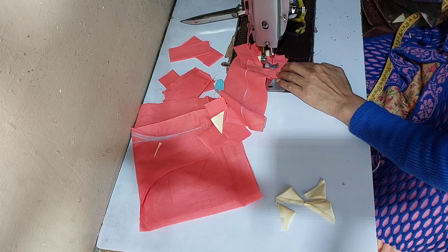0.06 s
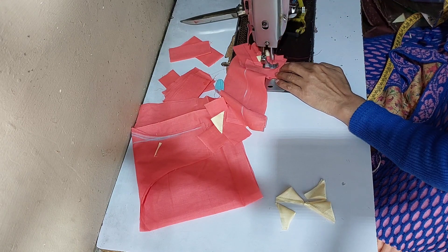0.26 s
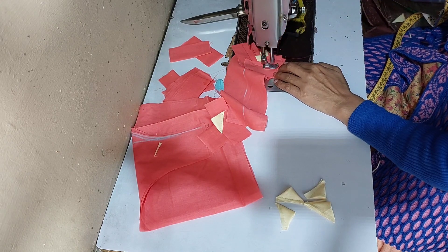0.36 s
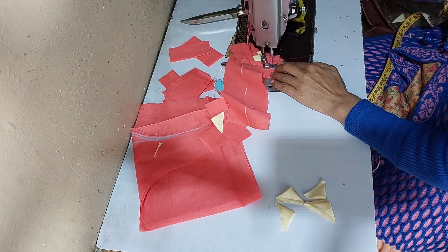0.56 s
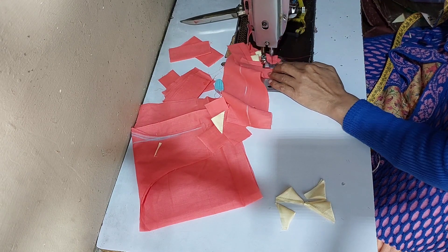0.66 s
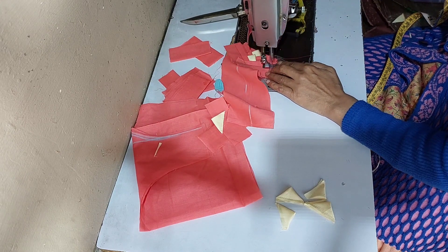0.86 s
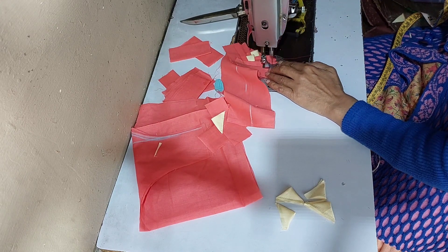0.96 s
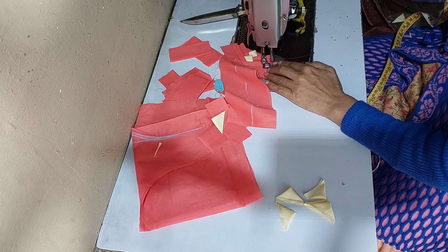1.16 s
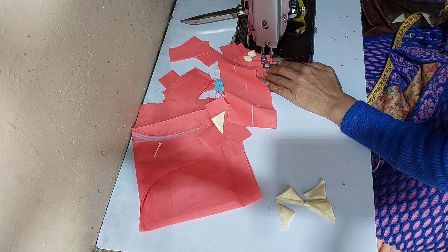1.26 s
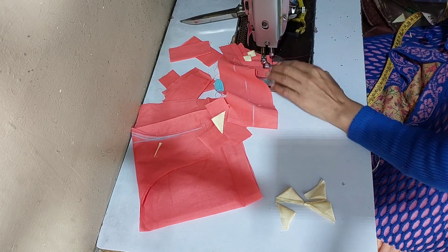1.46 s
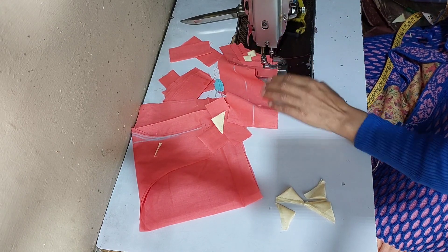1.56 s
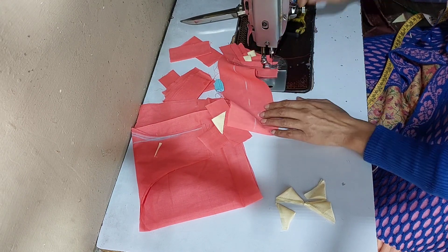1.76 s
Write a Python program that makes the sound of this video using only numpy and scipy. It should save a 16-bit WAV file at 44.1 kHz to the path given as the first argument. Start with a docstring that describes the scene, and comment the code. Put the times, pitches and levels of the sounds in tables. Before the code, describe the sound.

Sewing machine whirs up quickly, clatters through about a dozen stitches, coasts down and stops

```python
"""A household sewing machine on a table, in a quiet room with a low drone.
Frame and gears stir as shaped noise and wavering tones; the motor strains and whines (pulsed noise), the
table hums (unsteady sine), an overtone climbs. Then the bed knocks (decaying modes) and each stitch is a
bright needle swish (gritty noise burst) while the machine coasts down.
A few small clicks follow, each a scrape and a short ring."""
import sys
import numpy as np
from scipy import signal
from scipy.fft import rfft, irfft, next_fast_len
from scipy.io import wavfile
from scipy.ndimage import map_coordinates

SR = 44100
rng = np.random.default_rng(int(sys.argv[2]) if len(sys.argv) > 2 else 0)


def bounce(signal):
    """Save signal as a 16-bit WAV file at the path given by the first command-line argument."""
    frames = np.transpose(np.atleast_2d(signal))
    limited = np.clip(frames, -1, 1)
    pcm = np.round(limited * 32767).astype(np.int16)
    wavfile.write(sys.argv[1], SR, pcm)


def how_loud(loudness_db):
    """Turn decibels into a plain amplitude multiplier (0 dB gives 1, 20 dB gives 10)."""
    steps = np.asarray(loudness_db, float) / 20
    return 10 ** steps


N = 79380
T = np.arange(N) / SR


def unit(x):
    """Scale to rms 1."""
    return x / np.sqrt(np.mean(x ** 2) + 1e-20)


def along(points, hz):
    """Interpolate (f/Hz, value) points on a log frequency axis."""
    f, v = np.transpose(points)
    return np.interp(np.log(hz + 1), np.log(f + 1), v)


def curves(rows):
    """One value per sample for each column after the time."""
    s, *cols = np.transpose(rows)
    return [np.interp(T, s, c) for c in cols]


def wobble(knots_per_s):
    """Smooth random curve through normal-distributed knots."""
    return map_coordinates(rng.standard_normal(N // 50), [T * knots_per_s])


def sweep(hz):
    """Phase/rad of a varying frequency."""
    return 2 * np.pi * np.cumsum(hz, axis=-1) / SR


def filtered(x, response, mirror="even"):
    """x, mirrored past its ends, times a complex response of frequency."""
    edge = SR // 4
    wide = np.pad(x, ((0, 0), (edge, edge)), mode="reflect", reflect_type=mirror)
    m = next_fast_len(N + SR)
    spectrum = rfft(wide, m) * response(np.fft.rfftfreq(m, 1 / SR))
    return irfft(spectrum, m)[..., edge:edge + N]


def ringing(x, peaks):
    """x through parallel resonances of alternating sign, rms 1."""
    def response(f):
        """Sum of second-order bandpasses."""
        total = 0
        for k, (centre_hz, width_hz, db) in enumerate(peaks):
            damping = 1j * f * width_hz
            total = total + (-1) ** k * how_loud(db) * damping / (centre_hz ** 2 - f * f + damping)
        return total
    return unit(filtered(x, response))


def coloured(x, spectrum):
    """x shaped by a spectrum, rms 1."""
    return unit(filtered(x, lambda hz: how_loud(along(spectrum, hz))))


def pair(gain=1):
    """Two unrelated noises under one gain."""
    return gain * rng.standard_normal((2, N))


# left-right likeness: f/Hz, correlation
ALIKENESS = [(60, 0.93), (180, 0.97), (550, 0.76), (1650, 0.0055), (4970, 0.093), (15000, -0.022)]


def spread(two):
    """Two unrelated sounds become left and right, alike in the bass."""
    def mid_side(hz):
        """Mid and side gains that give the wanted correlation."""
        turn = np.arccos(np.clip(along(ALIKENESS, hz), -1, 1)) / 2
        return np.array([np.cos(turn), np.sin(turn)])
    mid, side = filtered(two, mid_side, "odd")
    return np.array([mid + side, mid - side])


def bursts(rows):
    """Summed envelopes: linear rise, hold, exponential fall."""
    fall_20db_s = 0.013
    total = 0
    for s, db, hold_s, rise_s in rows:
        since_hold_s = np.clip(T - s - rise_s - hold_s, 0, 9)
        total = total + how_loud(db - 20 * since_hold_s / fall_20db_s) * np.clip((T - s) / rise_s, 0, 1)
    return total


# room noise spectrum: f/Hz, relative density/dB
DRONE_SPECTRUM = [(12, -67), (20, -54.5), (53, 3), (74, -18), (101, -31), (137, -22.5), (181, -22),
                  (308, -36), (345, -35), (8000, -51), (15800, -57.5)]


def drone():
    """Quiet room: low rumble plus one faint fuzzy tone of narrow noise."""
    rumble_db, line_hz, line_width_hz, line_db = -55, 212, 14, -56.5
    line = ringing(pair(), [(line_hz, line_width_hz, 0)])
    return how_loud(rumble_db) * coloured(pair(), DRONE_SPECTRUM) + how_loud(line_db) * line


# frame resonance levels: t/s, upper level/dB, lower level/dB
FRAME_LEVELS = [(0, -58, -61), (.09, -62.5, -89), (.15, -46, -41), (.18, -48, -52), (.205, -33, -42),
                (.24, -28.5, -50), (.28, -35, -54), (.33, -36, -46), (.41, -40, -52), (.47, -45, -48),
                (.555, -51, -33), (.64, -61, -31), (.676, -59, -39), (.82, -39, -45), (.9, -45, -40.5),
                (.99, -42.5, -37.5), (1.08, -53, -46.5), (1.12, -46, -47), (1.165, -40.5, -37.5),
                (1.235, -45, -52.5), (1.35, -46.5, -46), (1.43, -58.5, -56), (1.55, -70, -70)]
# single frame resonances: f/Hz, width/Hz, relative level/dB
UPPER_MODE = [(1060, 100, 0)]
LOWER_MODE = [(820, 70, 0)]


def frame():
    """Two narrow frame resonances fed by the drive: a wavering tone in narrow noise."""
    tone_over_noise_db, drift_hz = 5, 30

    def sung(mode):
        """One resonance, rms 1."""
        tone = np.sin(sweep(mode[0][0] + drift_hz * np.array([wobble(150), wobble(130)])))
        noise = ringing(ringing(pair(), mode), mode)
        return unit(noise + how_loud(tone_over_noise_db) * unit(tone))

    upper_db, lower_db = curves(FRAME_LEVELS)
    both = how_loud(upper_db) * sung(UPPER_MODE) + how_loud(lower_db) * sung(LOWER_MODE)
    return both * (T < FRAME_LEVELS[-1][0])


# running gear, before trims: t/s, body level/dB, hiss level/dB
RUN_LEVELS = [(0.0, -58, -55.5), (0.16, -45.5, -47.5), (0.24, -40, -35), (0.366, -36.5, -47),
              (0.41, -34.5, -34), (0.5, -34, -29.5), (0.576, -29.5, -35), (0.746, -32.5, -33.5),
              (0.966, -36, -37.5), (1.172, -39.5, -40), (1.242, -41.5, -41.5), (1.352, -45.5, -43.5),
              (1.448, -52, -53), (1.638, -61.5, -66.5), (1.8, -75.5, -80)]
# body resonances: f/Hz, width/Hz, relative level/dB
BODY_MODES = [(270, 37, 1), (413, 40, 4), (590, 81, -3), (945.6, 45, 3.5), (1437, 29, 0), (1800, 290, -5),
              (2420, 160, -17.5)]
# broad body noise: f/Hz, relative density/dB
BODY_SPECTRUM = [(35, -22), (76, -12), (130, -2), (230, -13), (426, -14), (588, -11), (1640, -29.5),
                 (2500, -63), (3250, -82.5), (5500, -120)]
# broad hiss: f/Hz, relative density/dB
HISS_SPECTRUM = [(710, -22), (1200, -4), (1640, -11), (1810, -5.5), (2500, -5), (3270, -2.5), (4150, -5.5),
                 (4930, -14.5), (5490, -5), (9940, -16), (12700, -15.5), (15800, -18.5)]
# hiss resonances: f/Hz, width/Hz, relative level/dB
HISS_MODES = [(1820, 66, 0), (2325, 43, 0.5), (3226, 65, 6), (3820, 130, 0.5), (4145, 200, 1.5),
              (4666, 330, -2), (5400, 140, -8), (6430, 51, -2)]
# floor resonance: f/Hz, width/Hz, relative level/dB
RUMBLE_MODE = [(68.9, 45, 0)]
# floor rumble: t/s, level/dB
RUMBLE_LEVELS = [(0, -46.5), (.2, -49.5), (.5, -38), (.75, -38), (1.0, -32.5), (1.2, -43.5), (1.42, -43.5),
                 (1.54, -54), (1.58, -38.5), (1.62, -52), (1.655, -45), (1.715, -40), (1.742, -56),
                 (1.77, -37), (1.8, -47)]


def gears():
    """Noise rings the body; belts and shafts hiss; the floor rumbles on a wavering low note."""
    body_broad_db, body_trim_db, body_shake_db = 4, 2.5, 1.3
    hiss_ring_db, hiss_trim_db, hiss_shake_db, ring_shake_db = -1.5, 1.25, 0.96, 3.5
    waver_hz, tone_over_noise_db = 5, 5
    body_db, hiss_db = curves(RUN_LEVELS)
    rumble_db, = curves(RUMBLE_LEVELS)

    body = unit(ringing(pair(), BODY_MODES) + how_loud(body_broad_db) * coloured(pair(), BODY_SPECTRUM))
    body_gain = how_loud(body_db + body_trim_db + body_shake_db * wobble(30.28))

    broad_hiss = coloured(pair(how_loud(hiss_shake_db * wobble(150))), HISS_SPECTRUM)
    ringing_hiss = ringing(pair(how_loud(ring_shake_db * wobble(60.85))), HISS_MODES)
    hiss = unit(broad_hiss + how_loud(hiss_ring_db) * ringing_hiss)

    tone = np.sin(sweep(RUMBLE_MODE[0][0] + waver_hz * wobble(20)))
    low_noise = ringing(ringing(pair(), RUMBLE_MODE), RUMBLE_MODE)
    rumble = unit(low_noise + how_loud(tone_over_noise_db) * unit(tone))
    return body_gain * body + how_loud(hiss_db + hiss_trim_db) * hiss + how_loud(rumble_db) * rumble


# motor under load, before fade: t/s, whine level/dB, whirr level/dB
LOAD_LEVELS = [(.12, -55, -64), (.172, -60, -71), (.2, -36.5, -45), (.252, -27.5, -28), (.3, -22, -27),
               (.35, -21, -25), (.39, -23.5, -25.5), (.46, -30, -29), (.53, -36, -33.5), (.6, -39, -38),
               (.69, -40, -44), (.8, -44, -50)]
# casing resonances: f/Hz, width/Hz, relative level/dB
WHINE_MODES = [(1631, 88, -12.5), (3150, 27, -1.5), (3437, 31, 0.5), (3673, 200, -6), (4990, 170, -9.5),
               (5610, 140, -13.5), (6220, 68, -20.5), (6810, 70, -14.5), (7630, 37, -8)]
# broad whine: f/Hz, relative density/dB
WHINE_SPECTRUM = [(760, -55.5), (1300, -26.5), (1620, -25.5), (2540, -19), (3300, -9.5), (3980, -9),
                  (4320, -17.5), (7760, -17.5), (9770, -31), (12400, -23.5), (15800, -36.5)]


def motor():
    """Brush noise pulsing with the mains rings the casing under load; one part whirrs on each pulse."""
    mains_hz, mains_depth, fade_in_s, fade_out_s = 50.83, 0.057, 0.033, 0.13
    whine_broad_db, whine_shake_db = 0.5, 1.5
    whirr_mode = [(4020, 180, 0)]  # f/Hz, width/Hz, dB
    whine_db, whirr_db = curves(LOAD_LEVELS)
    fade_out = np.clip((LOAD_LEVELS[-1][0] - T) / fade_out_s, 0, 1)
    fade_in = np.clip((T - LOAD_LEVELS[0][0]) / fade_in_s, 0, 1)

    cycles = mains_hz * T + 0.075 * wobble(20)
    pulse = 1 + mains_depth * np.sin(2 * np.pi * cycles)
    whine = ringing(pair(pulse), WHINE_MODES)
    whine = unit(whine + how_loud(whine_broad_db) * coloured(pair(pulse), WHINE_SPECTRUM))

    count = np.floor(cycles)
    ticks = np.diff(count, prepend=count[0])  # one spark per cycle
    sparks = unit(ticks * (1 + 0.17 * rng.standard_normal((2, N)))) + pair(pulse)
    whirr = ringing(ringing(sparks, whirr_mode), whirr_mode)
    whine_gain = how_loud(whine_db + whine_shake_db * wobble(20.3))
    return fade_in * fade_out * (whine_gain * whine + how_loud(whirr_db) * whirr)


# table hum, before jitter: t/s, f/Hz, rms level/dB
HUM_TRACK = [(0.12, 102.3, -69), (0.178, 94.3, -55), (0.194, 101.5, -35.5), (0.298, 102.1, -23),
             (0.326, 95.5, -44), (0.338, 102, -26.5), (0.362, 112, -16), (0.386, 110, -28),
             (0.446, 115.6, -21), (0.462, 110, -15), (0.478, 108.7, -25.5), (0.558, 114.6, -19),
             (0.6, 109.8, -27.5), (0.608, 112.2, -21), (0.684, 110.6, -28), (0.7, 110.6, -21.5),
             (0.712, 113.3, -29), (0.728, 111, -30), (0.74, 113.3, -63), (0.772, 111.7, -19.5),
             (0.824, 108.7, -33), (0.836, 112.2, -46), (0.844, 113, -26.5), (0.876, 111.4, -23.5),
             (0.948, 113.6, -33), (0.956, 114.8, -26.5), (1.04, 110.2, -28.5), (1.052, 103.5, -42),
             (1.094, 106.8, -27), (1.158, 117.5, -93), (1.166, 117.6, -34.5), (1.246, 110, -37),
             (1.29, 113, -38.5), (1.298, 108, -49), (1.326, 115.6, -51), (1.342, 107, -65),
             (1.362, 114.4, -49), (1.522, 112.3, -51), (1.53, 114.5, -61), (1.55, 107.7, -43)]


def hum():
    """The table top drones as one sine, slightly unsteady in pitch and level."""
    jitter_hz, shake_db = 2.54, 0.6
    hz, db = curves(HUM_TRACK)
    phase = sweep(hz + jitter_hz * wobble(30))
    sounding = (T > HUM_TRACK[0][0]) * (T < HUM_TRACK[-1][0])
    return np.sqrt(2) * how_loud(db + shake_db * wobble(37.0)) * np.sin(phase) * sounding


# motor overtone, before waver: t/s, f/Hz, rms level/dB
CLIMB_TRACK = [(.26, 1400, -64), (.3, 1470, -40.5), (.335, 1610, -37.5), (.36, 1660, -37), (.41, 1680, -53),
               (.45, 1690, -61.5)]


def climb():
    """A wavering overtone rises as the motor gains speed."""
    waver_hz = 70
    hz, db = curves(CLIMB_TRACK)
    phase = sweep(hz + waver_hz * np.array([wobble(150), wobble(150)]))
    sounding = (T > CLIMB_TRACK[0][0]) * (T < CLIMB_TRACK[-1][0])
    return np.sqrt(2) * how_loud(db) * np.sin(phase) * sounding


# bed knocks: t/s, relative level/dB, centre f/Hz
KNOCK_EVENTS = [(.333, -21, 380), (.396, -20, 430.4), (.533, -12, 557), (.609, -15.5, 824),
                (.689, -19.5, 380), (.724, -17.5, 486), (.767, -14.5, 520), (.812, -19.5, 454),
                (0.852, -15.5, 414), (.947, -14, 526), (1.058, -22, 270), (1.107, -23, 1065),
                (1.154, -16, 500), (1.18, -19.5, 590), (1.247, -25.5, 390), (1.349, -32, 833),
                (1.441, -28.5, 1163)]
# bed modes, before random spread: f/Hz, relative level/dB, t60/s
BED_MODES = [(270, -3, 0.11), (380, -9, 0.12), (427, 0, 0.076), (581.4, 2.5, 0.044), (829, -10, 0.041),
             (929, -2.5, 0.034), (1082, 1, 0.034), (1200, -2, 0.037)]


def knocks():
    """Each knock rings the bed's decaying modes anew, favouring those near its centre."""
    mode_spread_db, focus_db_per_oct, detune, attack_s = 1.5, 10, 0.016, 0.0042
    out, t = np.zeros(N + SR), T[:SR // 5]
    hz, level_db, t60_s = np.transpose(BED_MODES)[:, :, None]
    chance = rng.standard_normal((len(KNOCK_EVENTS), len(BED_MODES), 1))
    for (s, db, centre_hz), draw in zip(KNOCK_EVENTS, chance):
        off_centre_db = focus_db_per_oct * abs(np.log2(hz / centre_hz))
        gain = how_loud(level_db + mode_spread_db * draw - off_centre_db)
        gain = gain / np.linalg.norm(gain)
        modes = gain * how_loud(-60 * t / t60_s) * np.sin(2 * np.pi * hz * (1 + detune * draw) * t)
        out[round(s * SR):][:len(t)] += how_loud(db) * modes.sum(axis=0) * (1 - np.exp(-t / attack_s))
    return out[:N]


# room decay: f/Hz, t60/s
ROOM_DECAY = [(200, 0.2), (2000, 0.3), (10000, 0.2)]


def room(x):
    """Room's answer: x convolved with noise whose frequencies each die at their own speed."""
    delay_samples = 200
    hz, t, z = signal.stft(rng.standard_normal((2, SR // 2)), SR, nperseg=256)
    decay = how_loud(-60 * t / along(ROOM_DECAY, hz)[:, None])
    tail = signal.istft(z * decay, SR, nperseg=256)[1]
    tail = tail / np.linalg.norm(tail[0])
    late = np.pad(x, ((0, 0), (delay_samples, 0)))
    return spread(signal.fftconvolve(late, tail, axes=1)[:, :N])


# needle swishes: t/s, relative level/dB, hold/s, rise/s
NEEDLE_EVENTS = [(0.406, -22, 0.016, 0.006), (0.49, -20.5, 0.02, 0.006), (0.5602, -16.5, 0.0071, 0.006),
                 (0.6344, -19.5, 0.015, 0.006), (0.714, -20.5, 0.014, 0.0056), (0.7985, -20, 0.012, 0.006),
                 (0.895, -16.5, 0.0092, 0.0062), (1.0095, -18.5, 0.01, 0.003), (1.102, -35, 0.0092, 0.0054),
                 (1.135, -22.5, 0.011, 0.004), (1.248, -29, 0.005, 0.002), (1.285, -30.5, 0.015, 0.006),
                 (1.3626, -35, 0.0097, 0.0068)]
# swish spectrum: f/Hz, relative density/dB
NEEDLE_SPECTRUM = [(150, -46), (410, -21), (700, -15.5), (1010, -4), (1530, -10), (1840, -6), (3140, -7),
                   (3620, -4), (8670, -14.5), (9880, -20.5), (12000, -13), (15800, -17)]


def needle():
    """Each stitch is a short swish of coloured noise with a gritty level."""
    level_db, grit_db, grit_per_s = -8.5, 4, 600
    grit = how_loud(grit_db * wobble(grit_per_s))
    return how_loud(level_db) * bursts(NEEDLE_EVENTS) * coloured(pair(grit), NEEDLE_SPECTRUM)


# small clicks: t/s, relative level/dB, hold/s, rise/s
CLICK_EVENTS = [(1.538, -38.5, 0.0075, 0.0014), (1.578, -37.5, 0.0071, 0.0016),
                (1.712, -58.5, 0.00625, 0.0023)]
# scrape spectrum: f/Hz, relative density/dB
CLICK_SPECTRUM = [(410, -19), (700, -11), (3970, -9), (4290, -7.5), (10000, -21.5), (15800, -23)]
# click modes, before random spread: f/Hz, relative level/dB, t60/s
CLICK_RINGS = [(1710, 0, 0.04), (2280, 1, .03), (3106, -1, 0.027), (4221, 0, .04), (5300, -6.5, 0.05),
               (8660, -3.5, 0.051)]


def clicks():
    """Small metal parts settle after the machine stops: a noise scrape and short decaying modes."""
    scrape_db, ring_db, mode_spread_db, attack_s = -7.0, -8.5, 2, 0.00084
    grit_db, grit_per_s = 4, 600
    grit = how_loud(grit_db * wobble(grit_per_s))
    out = how_loud(scrape_db) * bursts(CLICK_EVENTS) * coloured(pair(grit), CLICK_SPECTRUM)
    t = T[:SR // 10]
    hz, level_db, t60_s = np.transpose(CLICK_RINGS)[:, :, None]
    chance = rng.standard_normal((len(CLICK_EVENTS), 2, len(CLICK_RINGS), 1))
    for (s, db, *_), draw in zip(CLICK_EVENTS, chance):
        gain = how_loud(db + ring_db + level_db + mode_spread_db * draw - 60 * t / t60_s)
        modes = gain * np.sin(2 * np.pi * hz * t + draw)
        ring = modes.sum(axis=1) * (1 - np.exp(-t / attack_s))
        piece = out[:, round(s * SR):][:, :len(t)]  # a view: adds into out
        piece += ring[:, :piece.shape[1]]
    return out


def scene():
    """All sources; the hits also get the room's answer."""
    room_db = -7
    hits = spread(needle() + clicks()) + knocks()
    machine = spread(motor() + climb() + frame() + gears() + drone())
    return machine + hits + how_loud(room_db) * room(hits) + hum()


def low_pass(x):
    """Removes everything above the highest recorded frequency."""
    return signal.sosfilt(signal.butter(12, 16000, fs=SR, output="sos"), x)


# microphone balance: f/Hz, left minus right/dB
MIC_LEAN = [(60, -2.5), (180, 2.5), (550, -0.5), (1650, -1.5), (4970, 0), (15000, -1)]


def record(dry):
    """Two microphones of slightly different colour, weak in deep bass, cut off at the top."""
    low_hz, top_hz = 46, 16000

    def response(hz):
        """Left and right gains."""
        lean = how_loud(np.array([[.5], [-.5]]) * along(MIC_LEAN, hz))
        return lean * (hz < top_hz) / np.sqrt(1 + (low_hz / (hz + 1)) ** 4)

    mix = filtered(dry, response, "odd")
    return low_pass(mix)


dry = scene()
out = record(dry)
bounce(out)
```